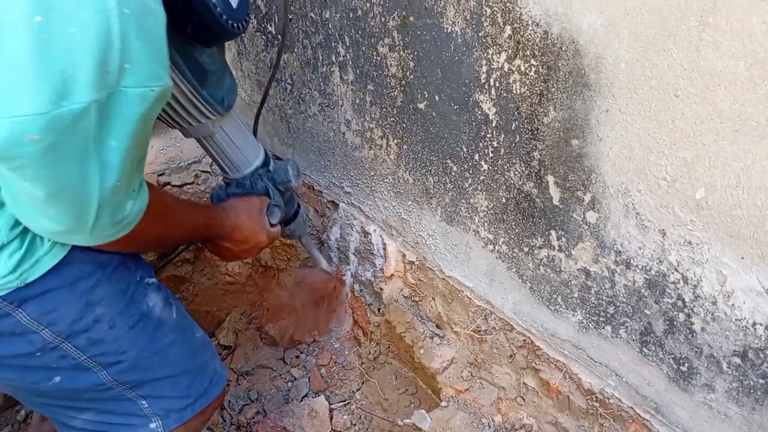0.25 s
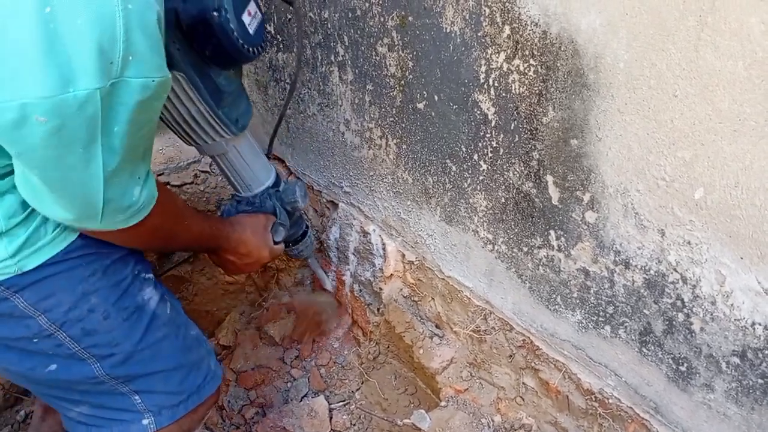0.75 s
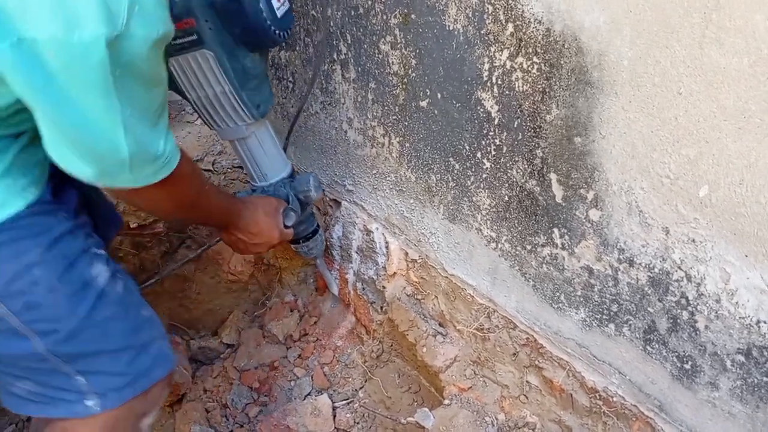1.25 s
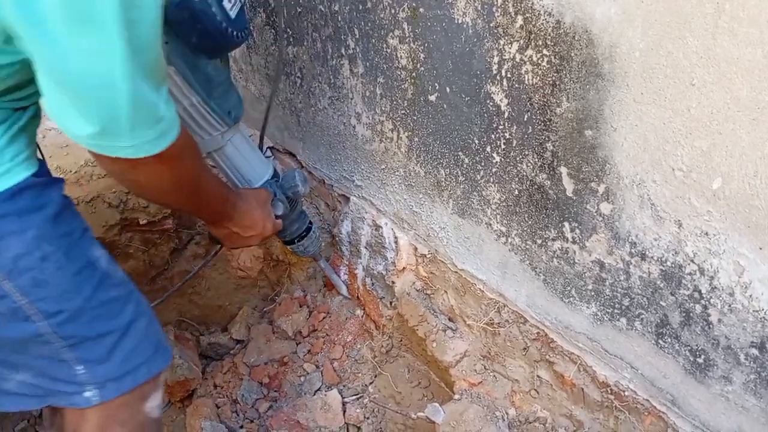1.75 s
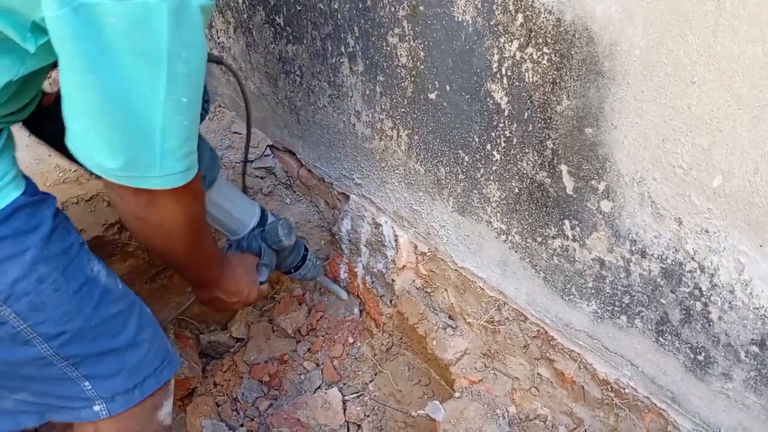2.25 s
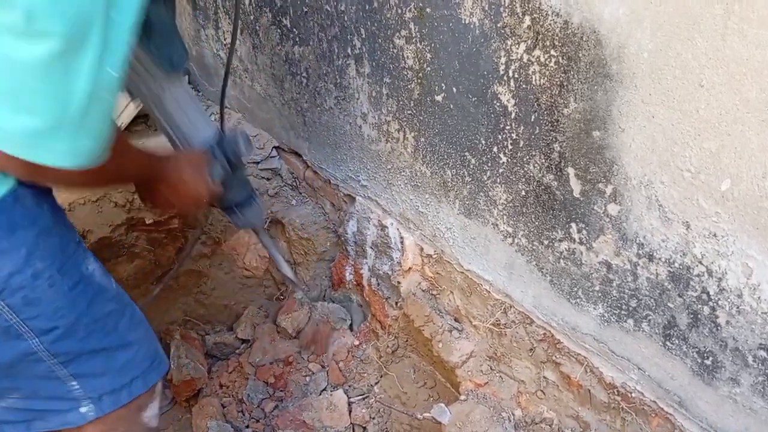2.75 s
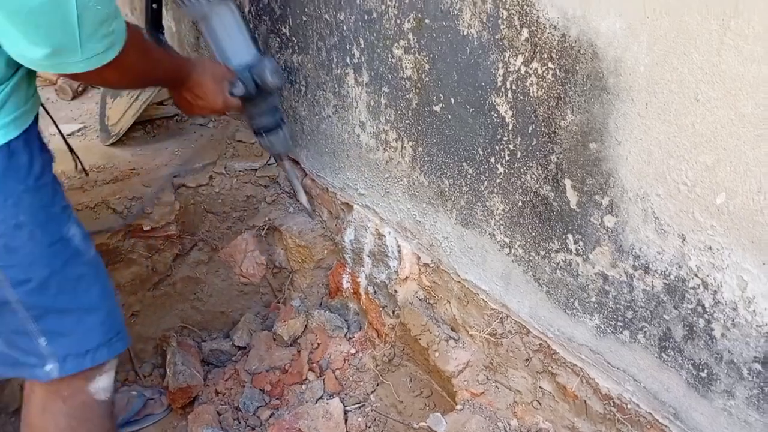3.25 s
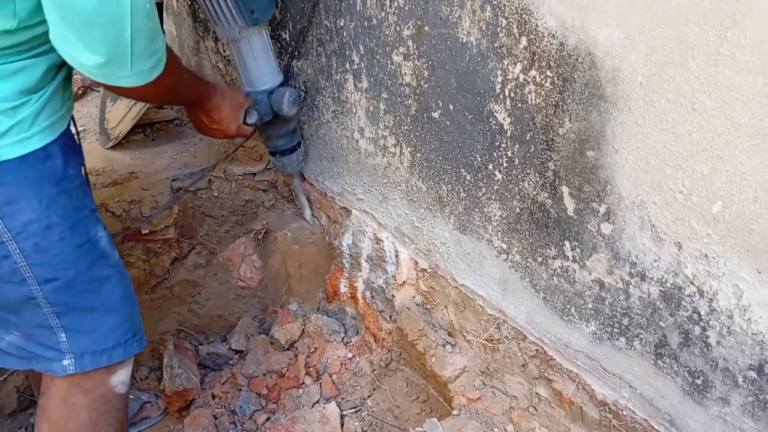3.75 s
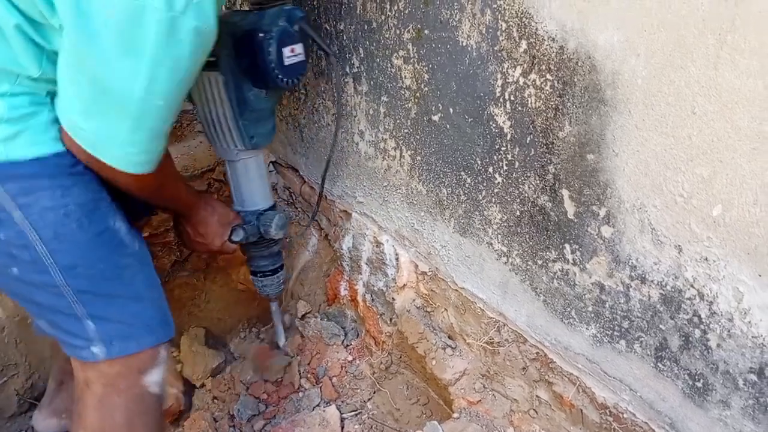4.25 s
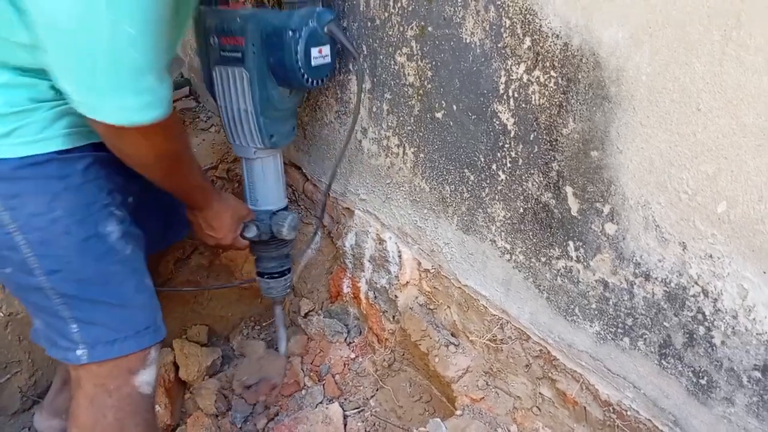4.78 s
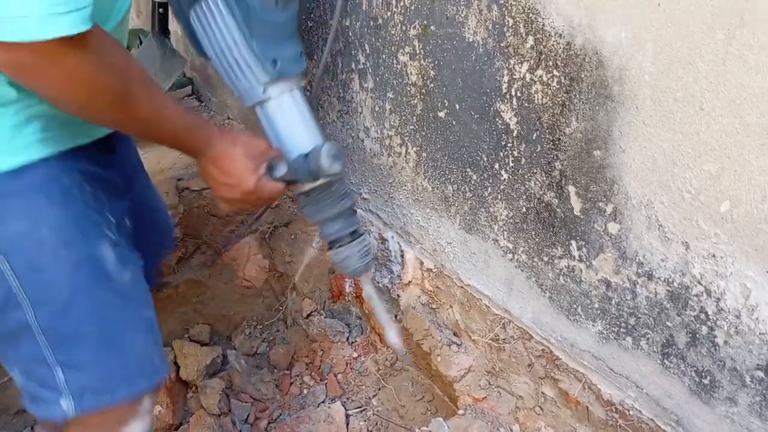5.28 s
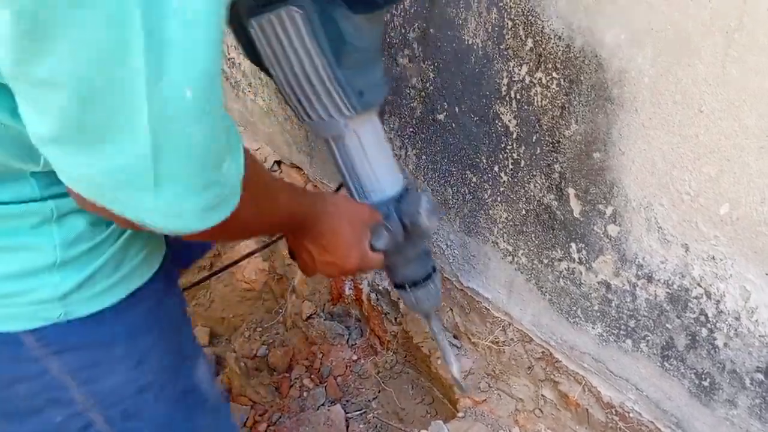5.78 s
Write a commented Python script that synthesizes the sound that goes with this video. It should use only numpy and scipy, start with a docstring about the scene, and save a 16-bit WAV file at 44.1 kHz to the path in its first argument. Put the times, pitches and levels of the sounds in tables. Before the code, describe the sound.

An electric demolition hammer pounds brick and soil in three short bouts, its motor whining and hissing throughout, then idles.

```python
"""An electric demolition hammer pounds brick and soil in three bouts, close by at the foot of a wall.
A pinion drives the crank, which throws the striker once a turn. Under load the motor slows, the gears
grow loud, and each blow cracks, rings the chisel and thumps the ground. The motor fan whines and hisses
throughout. After the last bout the chisel tip is set down on rubble and the tool idles. Mono."""
import sys
import numpy as np
from scipy import signal
from scipy.fft import rfft, irfft, next_fast_len
from scipy.io import wavfile
from scipy.ndimage import uniform_filter1d, map_coordinates

SR = 44100
rng = np.random.default_rng(int(sys.argv[2]) if len(sys.argv) > 2 else 0)


def file_out(sig):
    """Save sig as 16-bit WAV at sys.argv[1]."""
    # one column per channel
    cols = np.atleast_2d(sig).T
    # limit, then scale
    lim = np.clip(cols, -1, 1)
    pcm = np.round(lim * 32767).astype(np.int16)
    wavfile.write(sys.argv[1], SR, pcm)


N = 265464
TIME_S = np.arange(N) / SR


def amp(db):
    return 10 ** (np.asarray(db) / 20)


def unit_rms(x):
    return x / np.sqrt(np.mean(x ** 2) + 1e-20)


def curves(rows, at_s=TIME_S):
    """Each column after the time, interpolated."""
    times_s, *columns = np.transpose(rows)
    return [np.interp(at_s, times_s, column) for column in columns]


def swells(rows):
    """Gain from (s, dB) rows joined in amplitude: broad tops, sharp dips."""
    return curves([(s, amp(db)) for s, db in rows])[0]


def wobble(rate_hz):
    """Smooth random curve, rate_hz knots a second."""
    knots = rng.standard_normal(int(N * rate_hz / SR) + 4)
    return map_coordinates(knots, [TIME_S * rate_hz])


def filtered(x, response):
    """x times a complex response of frequency."""
    size = next_fast_len(N + SR // 2)
    return irfft(rfft(x, size) * response(np.fft.rfftfreq(size, 1 / SR)), size)[..., :N]


def resonate_twice(x, modes):
    """Two passes through a bank of resonances of alternating sign."""
    def bank(hz):
        return sum((-1) ** k * amp(db) * 1j * hz * width / (centre ** 2 - hz ** 2 + 1j * hz * width)
                   for k, (centre, width, db) in enumerate(modes))
    return filtered(filtered(x, bank), bank)


def rush(spectrum, patchy_db):
    """Coloured noise of rms 1 with patches of random gain."""
    cells = signal.stft(rng.standard_normal(N + 512), nperseg=512)[2]
    patches = uniform_filter1d(rng.standard_normal(cells.shape), size=2, axis=0)
    patches = unit_rms(uniform_filter1d(patches, size=36, axis=1))
    noise = signal.istft(cells * amp(patchy_db * patches), nperseg=512)[1][:N]
    knots_hz, db = np.transpose(spectrum)
    colour = lambda hz: amp(np.interp(np.log(hz + 1), np.log(knots_hz), db, left=-120))
    return unit_rms(filtered(noise, colour))


def tone(cycles, jitter_rad):
    """Sine of rms 1 with phase jitter."""
    return np.sqrt(2) * np.sin(2 * np.pi * cycles + jitter_rad * wobble(150))


def wall_echo_gain(rate_hz, echo=0.95, drift_rad=1.65):
    """A tone meets its echo in drifting phase: broad swells, brief dips."""
    return unit_rms(np.abs(1 + echo * np.exp(1j * drift_rad * wobble(rate_hz))))


def once_a_turn(crank, at_turns, sharpness):
    """A swell of peak 1 around one crank angle."""
    return np.exp(sharpness * (np.cos(2 * np.pi * (crank - at_turns)) - 1))


def stroke_ends(crank):
    """A swell at each end of the piston stroke."""
    return once_a_turn(crank, -0.26, sharpness=2.2) + 0.91 * once_a_turn(crank, 0.18, sharpness=3.8)


# Each row: time in seconds, rotor speed in turns a second.
ROTOR_SPEED = [(0.0, 274.66), (0.099, 280.8), (0.165, 281.6), (0.275, 271.9), (0.389, 271.55),
               (0.665, 274.3), (0.749, 271.38), (0.874, 270.74), (0.961, 266.9), (1.091, 266.51),
               (1.26, 268.01), (1.408, 266.38), (1.64, 267.1), (1.788, 284.5), (1.86, 285.6),
               (2.014, 278.85), (2.14, 267.1), (2.316, 267.3), (2.389, 264.7), (2.59, 284.6), (2.67, 286.0),
               (2.879, 275.23), (3.408, 276.89), (3.579, 273.62), (3.68, 267.48), (3.84, 266.87),
               (3.93, 268.3), (3.995, 279.4), (4.07, 285.3), (4.155, 285.4), (4.31, 276.0), (4.383, 275.1),
               (4.618, 276.59), (6.02, 276.89)]
PINION_TEETH, GEAR_TEETH, INERTIA_S = 8, 77, 0.04


def drive():
    """Shaft, pinion and crank angles in turns, and load (0 to 1), which rises as the rotor slows."""
    speed_hz = uniform_filter1d(curves(ROTOR_SPEED)[0], size=round(INERTIA_S * SR))
    load = np.clip((279 - speed_hz) / 11, 0, 1)
    turns = np.cumsum(speed_hz) / SR
    crank = turns * PINION_TEETH / GEAR_TEETH - 0.38
    shaft = turns + 0.0095 * load * np.sin(2 * np.pi * (crank + 0.51))  # slows on each piston squeeze
    pinion = turns + 0.046 * load * np.sin(2 * np.pi * (crank + 0.31))  # winds up, then lets go
    return shaft, pinion, crank, load


# Each row: time in seconds, level in dB.
UNBALANCE_LEVELS = [(0, -54), (1.7, -51), (2.4, -60), (2.6, -52), (3.05, -52), (3.3, -51), (4.1, -53),
                    (4.3, -46.5), (5.4, -50.5), (5.8, -65), (6.02, -57)]
# Each row: multiple of shaft speed, level in dB.
ROTOR_ORDERS = [(10, -58)]
MAINS_OVERTONE_HZ, MAINS_DB = 360, -58


def motor_hum(shaft):
    """A weak rotor tone, rotor unbalance and a mains overtone."""
    rotor = sum(amp(db + 0.74 * wobble(3.98)) * tone(order * shaft, 0.6) for order, db in ROTOR_ORDERS)
    unbalance = amp(curves(UNBALANCE_LEVELS)[0] + 2.5 * wobble(7)) * tone(shaft, 0.48)
    mains = np.sqrt(2) * np.sin(2 * np.pi * MAINS_OVERTONE_HZ * TIME_S)
    return rotor + unbalance + amp(MAINS_DB + 3 * wobble(4.6)) * mains


# One list per band: low, middle, high. Each row: frequency in Hz, relative density in dB.
ROAR_SPECTRA = [
    [(25, -33), (120, -24), (220, -18.5), (420, -14), (600, -4), (800, -3.5), (1100, -2.5), (1350, -5),
     (2000, -64)],
    [(900, -9), (1300, -4.5), (1500, -3.5), (1800, 1), (2100, -5.5), (3000, -60)],
    [(1600, -36), (2150, -5), (2900, -0.5), (3800, -1), (5000, -3.5), (6500, -14), (11000, -80)],
]
# Each row: frequency in Hz, relative density in dB.
HISS_SPECTRUM = [(2350, -29), (4000, -18), (4920, -11), (5090, -2), (5430, -2.5), (5520, 0), (6790, -1.5),
                 (7030, -2.5), (9060, -9.5), (10800, -20), (11000, -23.5), (13900, -23.5), (15100, -23),
                 (15800, -30)]
# Each row: time in seconds, then hiss, low roar and middle roar in dB.
AIR_LEVELS = [(0.0, -26, -33, -32), (0.03, -23, -28, -29), (0.07, -25.5, -34, -30.5), (1.16, -24, -32, -31),
              (1.59, -24, -24.5, -32), (1.71, -23.5, -36, -29), (1.81, -18, -33, -26.5),
              (2.13, -25, -37.5, -32.5), (2.3, -29, -32, -35.5), (2.55, -22, -35, -30),
              (3.03, -20.5, -34, -28), (3.97, -23.5, -29, -31), (4.16, -21, -31.5, -30.5),
              (4.26, -23, -32.5, -30.5), (4.95, -21, -30.5, -32), (5.01, -18.5, -31, -28),
              (5.05, -22.5, -33.5, -30), (5.82, -21, -32, -29.5), (5.99, -24.5, -38.5, -35.5),
              (6.02, -23, -35, -32)]


def fan_air(crank):
    """Fan roar and hiss, pulsing with the crank."""
    hiss_db, low_db, middle_db = curves(AIR_LEVELS)
    high_db = hiss_db - 3
    roar = sum(amp(db) * rush(spectrum, patchy_db=2.5)
               for db, spectrum in zip((low_db, middle_db, high_db), ROAR_SPECTRA))
    clatter = 1 + 0.29 * once_a_turn(crank, 0.12, sharpness=3)  # the idle striker rattles in its barrel
    roar *= amp(0.77 * wobble(12)) * unit_rms(clatter)
    hiss = unit_rms((1 + 0.12 * stroke_ends(crank)) * rush(HISS_SPECTRUM, patchy_db=2))
    return amp(0.4 * wobble(10)) * (roar + amp(hiss_db) * hiss)


# Each row: time in seconds, level in dB.
BLADE_LEVELS = [(0.0, -28), (0.12, -20.5), (0.2, -31), (0.23, -19.5), (0.3, -30), (0.42, -24.5),
                (1.02, -31), (1.12, -20), (1.34, -27.5), (1.44, -20.5), (1.57, -37), (1.64, -16.5),
                (1.76, -31), (1.94, -19), (2.01, -29.5), (2.43, -34), (2.46, -21.5), (2.5, -30),
                (2.67, -15.5), (2.77, -29), (3.24, -23), (3.28, -17), (3.33, -29), (3.42, -22), (3.75, -35),
                (3.91, -23), (3.96, -28), (4.02, -15), (4.19, -21.5), (4.36, -13), (4.58, -46), (4.69, -16),
                (4.81, -36), (4.84, -25), (4.96, -35), (5.03, -15), (5.18, -18.5), (5.25, -49), (5.35, -14),
                (5.62, -39), (5.65, -20), (5.72, -28), (5.75, -19), (6.02, -18)]
BLADE_OCTAVE_LEVELS = [(0.0, -42), (0.13, -32), (0.2, -49), (0.28, -36.5), (0.67, -59), (0.69, -31.5),
                       (1.68, -35), (1.76, -56), (1.94, -36.5), (2.4, -44), (2.51, -36.5), (2.92, -44),
                       (4.01, -33), (4.27, -44), (4.31, -29), (4.46, -29.5), (4.51, -43), (4.68, -25.5),
                       (4.73, -37), (4.91, -26.5), (4.98, -41), (5.03, -30), (5.15, -49), (5.2, -32),
                       (5.56, -47), (5.62, -32), (5.78, -32.5), (6.02, -41)]
FAN_BLADES = 19


def fan_whine(shaft, load):
    """The blade tone swells and fades as the tool is turned; its octave meets the wall's echo."""
    flutter = amp((1.1 + 2.6 * load) * wobble(60) + 0.7 * wobble(12))
    blade = flutter * swells(BLADE_LEVELS) * tone(FAN_BLADES * shaft, 0.1)
    octave_gain = swells(BLADE_OCTAVE_LEVELS) * amp(1.6 * wobble(60)) * wall_echo_gain(9.8)
    return blade + octave_gain * tone(2 * FAN_BLADES * shaft, 0.15)


# Each row: time in seconds, relative level in dB.
MESH_LEVELS = [(0.0, -30), (0.2, -32), (0.25, -24), (0.4, -28.5), (0.45, -37), (0.72, -27), (0.79, -23.5),
               (1.64, -23), (1.68, -40), (2.04, -29), (2.09, -25), (2.42, -28), (2.47, -38), (3.15, -33),
               (3.55, -35), (3.62, -25.5), (3.93, -22.5), (4.0, -36), (5.1, -39), (5.25, -29), (5.4, -43),
               (5.56, -28.5), (6.02, -38)]
MESH_THIRD_LEVELS = [(0.0, -20), (0.03, -24.5), (1.51, -28), (1.86, -30), (2.46, -32), (2.5, -21.5),
                     (3.47, -22), (3.5, -14.5), (3.67, -24), (4.07, -26), (4.12, -17), (4.24, -32),
                     (5.03, -22.5), (5.53, -35), (5.58, -20.5), (6.02, -25)]
# Each row: centre in Hz, width in Hz, gain per pass in dB.
GEAR_CASE_MODES = [(2210, 325, -3)]


def gear_mesh(shaft, pinion, crank):
    """Three tooth harmonics; the lower two swell as the piston squeezes its air cushion."""
    squeeze = 0.67 + once_a_turn(crank, -0.16, sharpness=2.7)
    squeeze *= amp(curves(MESH_LEVELS)[0] + wobble(60) + 0.5 * wobble(11))
    tooth_force = squeeze * amp(3 * wobble(300)) * tone(PINION_TEETH * pinion, 0.7)
    first = 1.37 * resonate_twice(tooth_force, GEAR_CASE_MODES)
    second = amp(-11.5) * squeeze * tone(2 * PINION_TEETH * shaft, 0.54)
    third_gain = amp(curves(MESH_THIRD_LEVELS)[0] + wobble(80)) * wall_echo_gain(10) * stroke_ends(crank)
    return first + second + third_gain * tone(3 * PINION_TEETH * pinion, 1.0)


# Each row: start in seconds, level in dB, lower mode in Hz, T60 in seconds.
TIP_BUMPS = [(4.176, -27, 202, .07), (4.394, -33.5, 65, .13)]


def tip_bumps():
    """The chisel tip is set down on rubble: dull bumps of two modes."""
    out, t = np.zeros(N + SR), np.arange(SR // 8) / SR
    attack = 1 - np.exp(-t / 0.0026)
    for start_s, db, hz, t60_s in TIP_BUMPS:
        modes = np.sin(2 * np.pi * hz * t) + 1.2 * np.sin(2 * np.pi * 1.6 * hz * t)
        out[round(start_s * SR):][:len(t)] += amp(db - 60 * t / t60_s) * modes * attack
    return out[:N]


# Each row: time in seconds, scatter of the pushes in crank turns.
PUSH_SCATTER = [(0, 0.02), (.68, 0.022), (.8, 0.0023), (1.7, 0.0026), (2.1, 0.0075), (6.02, .006)]
# Each row: delay after the push in seconds, relative level in dB.
GROUND_CONTACTS = [(0, 0), (.015, -9)]
# Each row: centre in Hz, width in Hz, relative gain per pass in dB.
BRICK_MODES = [(490, 170, 0), (620, 120, -5)]
MORTAR_MODES = [(260, 130, 0), (385, 150, 1)]
SOIL_MODES = [(134.5, 52, 1), (192.7, 46, 2)]
FOOTING_MODES = [(59.3, 67, -3.5), (100, 130, -4)]
# One list per stretch: first bout's uneven start, its steady rest, second bout, third bout.
# Each row: time in seconds, then brick, mortar, soil and footing in dB.
GROUND_STRETCHES = [
    [(0.0, -47, -42, -41, -35), (0.086, -39, -43, -41, -49), (0.112, -43, -39, -47, -42),
     (0.152, -44, -48, -47, -55), (0.216, -34.5, -43.5, -43, -43), (0.642, -38, -40, -49.5, -52),
     (0.72, -41, -45, -37, -47)],
    [(0.72, -38, -31, -38, -42), (0.766, -34, -33.5, -46, -49), (0.834, -32, -31, -41, -58),
     (1.272, -41, -35, -42.5, -64), (1.298, -34.5, -34.5, -43, -53), (1.64, -37, -34.5, -40, -53),
     (1.76, -53, -47, -60, -55)],
    [(2.0, -58, -62, -66, -84), (2.052, -46, -49, -53, -61), (2.116, -37.5, -34.5, -47, -51),
     (2.384, -41, -35.5, -37.5, -46), (2.486, -40, -41, -44, -42), (2.62, -52, -59, -55, -51),
     (2.66, -58, -52, -68, -65)],
    [(3.36, -58, -57, -48, -78), (3.484, -43, -52, -44, -46), (3.672, -33.5, -42.5, -30, -40),
     (3.894, -37, -34, -27, -46), (3.936, -42, -42, -43, -35), (4.042, -56, -53, -63, -50),
     (4.1, -47, -57, -53, -56)],
]
PUSH_LEAD_TURNS, DISPERSION_S_PER_HZ, FADE_S = 0.1497, 1.1e-4, 0.03


def ground_shake(crank):
    """The tool leans on the ground just before each blow, rebounds and grinds on rubble."""
    scatter_turns = curves(PUSH_SCATTER)[0]
    push_turns = crank + PUSH_LEAD_TURNS + scatter_turns * wobble(28)
    strokes = np.diff(np.floor(np.maximum.accumulate(push_turns)), prepend=0) > 0
    force = sum(amp(db + 0.32 * wobble(29.9)) * np.roll(strokes, round(delay_s * SR))
                for delay_s, db in GROUND_CONTACTS)
    grind_gain = (0.0046 + 0.68 * scatter_turns) * amp(2.2 * wobble(30))
    force += grind_gain * rng.standard_normal(N)
    # In the mortar bed the higher waves arrive later.
    lag_rad = lambda hz: np.pi * DISPERSION_S_PER_HZ * (np.clip(hz, 230, 520) - 230) ** 2
    force = filtered(force, lambda hz: np.exp(-1j * lag_rad(hz)))
    layers = np.array([unit_rms(resonate_twice(force, modes))
                       for modes in (BRICK_MODES, MORTAR_MODES, SOIL_MODES, FOOTING_MODES)])
    gains = np.zeros_like(layers)
    for stretch in GROUND_STRETCHES:
        inside_s = np.minimum(TIME_S - stretch[0][0] + 0.01, stretch[-1][0] - TIME_S)
        gains += amp(curves(stretch)) * np.clip(inside_s / FADE_S, 0, 1)
    wander_db = 0.5 * (wobble(20) + 0.67 * np.array([wobble(12) for _ in layers]))
    return np.sum(gains * amp(wander_db) * layers, axis=0)


# Blow colour in the three bouts. Each row: time in seconds, then crack, crunch, knock, ring in relative dB.
BLOW_BOUTS = [
    [(0.0, -5, -19, -4, -28), (0.2, -5.5, -5, -10, -20), (0.5, -5, -0.5, -8, -28),
     (0.66, -3.5, -5, -22, -24), (0.72, -5, -7, -14, -15), (0.9, -7.5, -4, -13, -19),
     (1.07, -2, -1, -8.5, -22), (1.2, -13, -20, -19, -25), (1.36, -5, -18, -2.5, -34),
     (1.5, -13, -4, -8, -38), (1.63, -6, 6, -10, -33), (1.66, -20, -19, -20, -38)],
    [(2.05, -8, -11, -15, -42), (2.24, -3, -7, -28, -38), (2.39, -2.5, -3, -11, -36),
     (2.5, -34, -21, -24, -33)],
    [(3.45, -10, -17, -8, -34), (3.57, -9, -19, -17, -16), (3.66, -16, -4, -11, -14.5),
     (3.86, -0.5, -12, -5.5, -13.5), (3.93, -13, -13, -8, -19), (3.98, -20, -18, -9, -45)],
]
# Blows that bite or miss. Each row: time in seconds, offset in dB in place of the random one.
BLOW_ACCENTS = [(.05, -5), (.15, 2), (.22, 1), (.29, 2), (.33, -5), (.36, 4.5), (.40, 6), (.43, -21),
                (.50, 4.5), (.61, 5), (.68, -11), (.85, 6), (1.1, 0), (1.4, 1.5), (1.47, 2.5), (1.57, 2.5),
                (2.385, 1.5), (3.64, 6), (3.89, -1)]


def striker_throws(crank, scatter_db=2):
    """One throw a crank turn within each bout: yields its sample and four levels in dB."""
    starts = np.flatnonzero(np.diff(np.floor(crank)) > 0)
    offsets_db = scatter_db * rng.standard_normal((len(starts), 4))
    for time_s, db in BLOW_ACCENTS:
        offsets_db[np.argmin(np.abs(starts / SR - time_s))] = db
    for bout in BLOW_BOUTS:
        for start, offset_db in zip(starts, offsets_db):
            if bout[0][0] <= start / SR <= bout[-1][0]:
                yield start, offset_db + curves(bout, at_s=start / SR)


# Each row: centre in Hz, width in Hz, gain per pass in dB.
CRACK_MODES = [(3860, 2540, 1), (7600, 7800, -1.5)]
CRUNCH_MODES = [(653, 360, -2), (893, 270, -2.5)]
KNOCK_MODES = [(1030, 420, 1.5), (1680, 1800, 0)]
GRIT_MODES = [(12600, 7000, -13)]
# Each row: frequency in Hz, relative level in dB, T60 in seconds.
CHISEL_MODES = [(10720, 0, .035), (10850, -6, .03)]
BURST_T60_S, CRACK_LOWPASS_HZ = (0.02, 0.06, 0.025, 0.03), 8100


def chisel_blows(crank):
    """Each blow rings the chisel and sets off four noise bursts: crack, crunch, knock and grit."""
    bursts, ring = np.zeros((4, N + SR)), np.zeros(N + SR)
    t = np.arange(SR // 20) / SR
    burst_attack, ring_attack = 1 - np.exp(-t / 0.00033), 1 - np.exp(-t / 0.0043)
    for start, (crack_db, crunch_db, knock_db, ring_db) in striker_throws(crank):
        span = slice(start, start + len(t))
        grit_db = crack_db - 35
        for burst, db, t60_s in zip(bursts, (crack_db, crunch_db, knock_db, grit_db), BURST_T60_S):
            burst[span] += amp(db - 60 * t / t60_s) * burst_attack * rng.standard_normal(len(t))
            burst[start + 12:start + 18] += amp(db + 9) * np.hanning(6)  # contact: one short push
        for hz, db, t60_s in CHISEL_MODES:
            ring[span] += amp(ring_db + db - 60 * t / t60_s) * np.sin(2 * np.pi * hz * t) * ring_attack
    bursts = bursts[:, :N]
    bursts[0] = filtered(bursts[0], lambda hz: 1 / (1 + 1j * hz / CRACK_LOWPASS_HZ) ** 2)
    colours = (CRACK_MODES, CRUNCH_MODES, KNOCK_MODES, GRIT_MODES)
    return ring[:N] + sum(resonate_twice(burst, modes) for burst, modes in zip(bursts, colours))


def scene():
    """Motor, blows, ground and tip bumps, alike in both channels."""
    shaft, pinion, crank, load = drive()
    motor = fan_whine(shaft, load) + gear_mesh(shaft, pinion, crank) + motor_hum(shaft) + fan_air(crank)
    mono = motor + chisel_blows(crank) + ground_shake(crank) + tip_bumps()
    return np.array([mono, mono])


def record(dry):
    """Rounds off the peaks, drops the deep bass and limits the band."""
    ceiling, highpass_hz, top_hz = 0.62, 40, 15750
    x = dry / (1 + np.abs(dry / ceiling) ** 6) ** (1 / 6)
    x = filtered(x, lambda hz: (1j * hz / (highpass_hz + 1j * hz)) ** 3)
    return filtered(x, lambda hz: hz < top_hz)


dry = scene()
out = record(dry)
file_out(out)
```